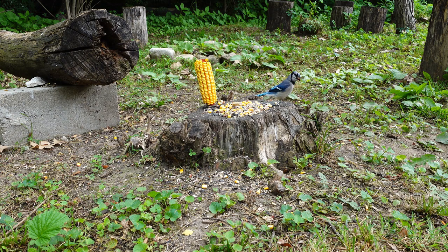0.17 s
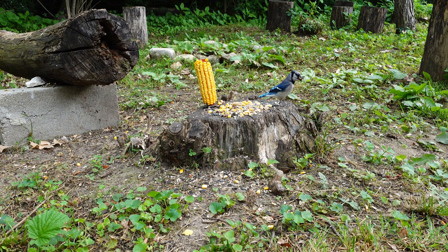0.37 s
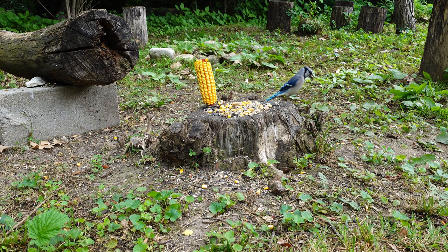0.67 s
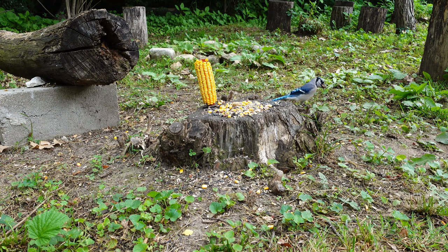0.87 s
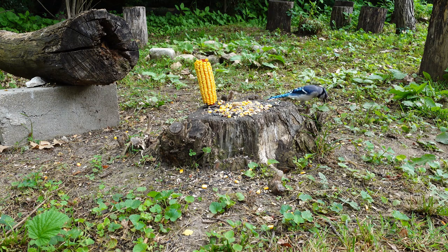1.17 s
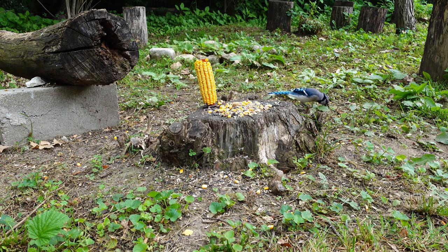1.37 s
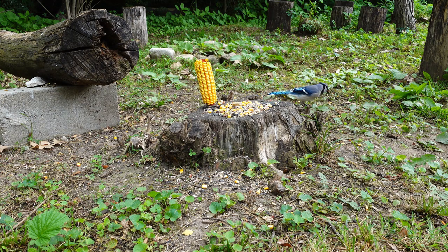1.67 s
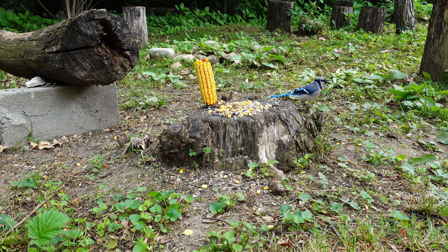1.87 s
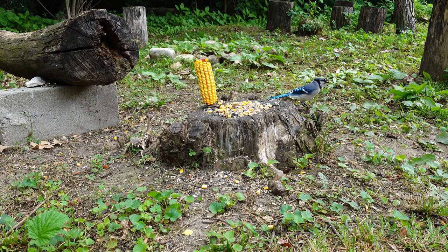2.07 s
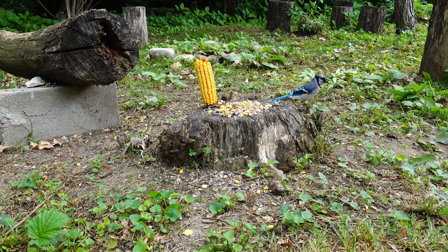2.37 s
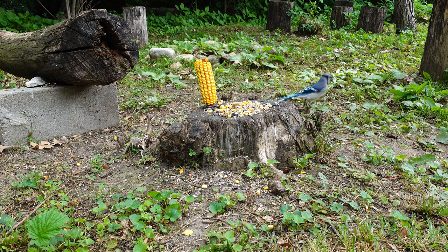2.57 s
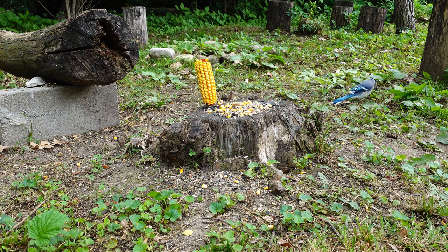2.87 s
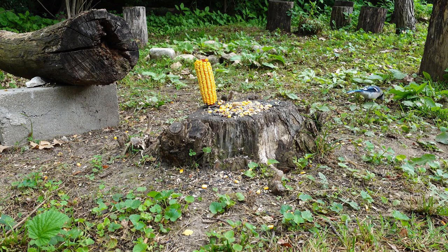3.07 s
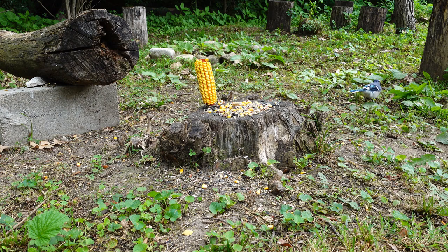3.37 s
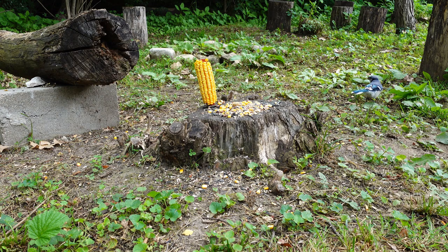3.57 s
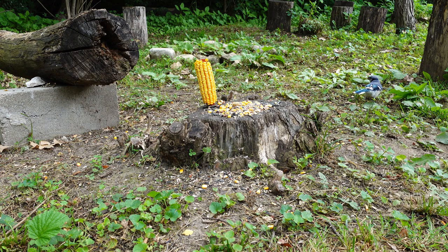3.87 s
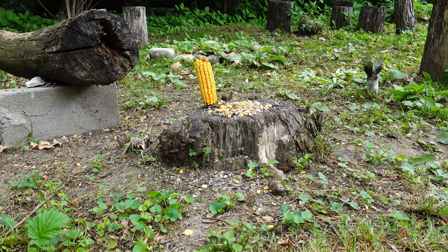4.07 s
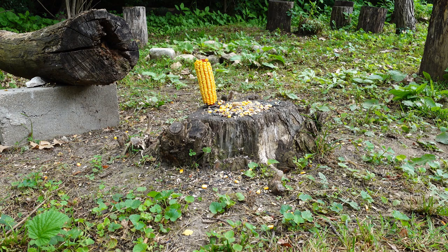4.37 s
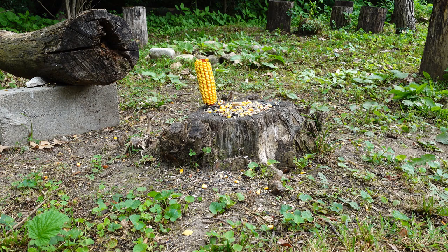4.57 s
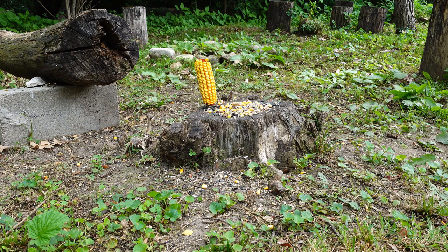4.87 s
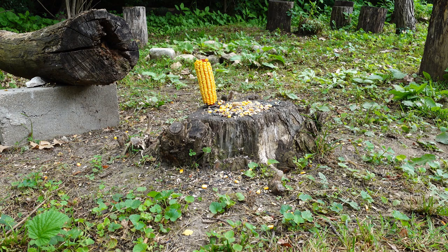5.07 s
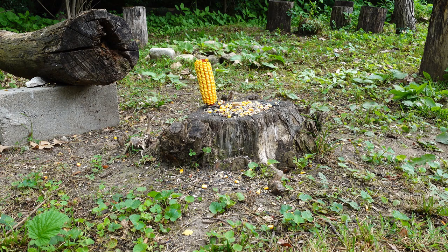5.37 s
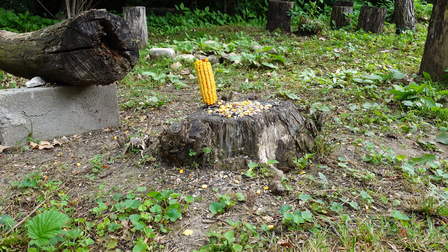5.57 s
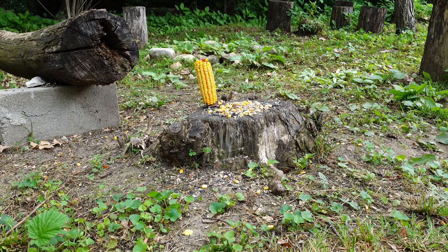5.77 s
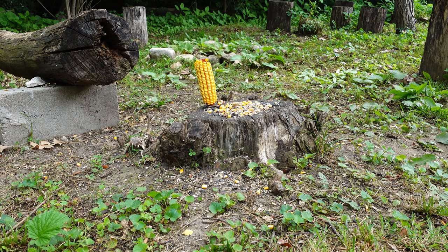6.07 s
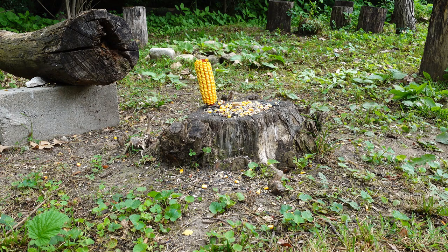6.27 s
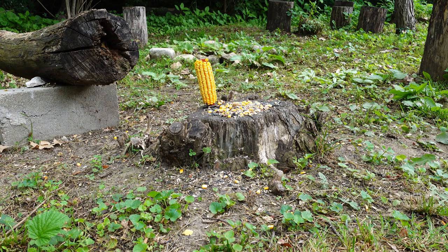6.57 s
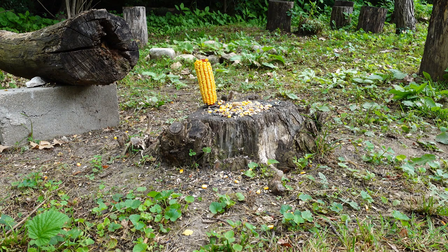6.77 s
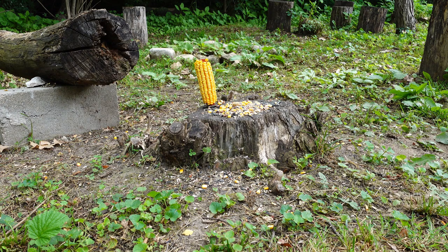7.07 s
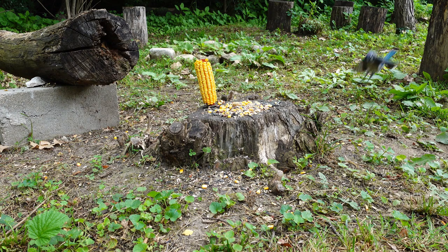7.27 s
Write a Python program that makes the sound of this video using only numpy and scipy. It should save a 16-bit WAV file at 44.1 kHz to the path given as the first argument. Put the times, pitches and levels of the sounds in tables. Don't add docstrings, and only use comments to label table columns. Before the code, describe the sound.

An open-air stereo microphone in a quiet wooded yard picks up a soft distant traffic hum centred near 1 kHz, slight low rumble and faint unsteady insect hiss throughout. Faint hoarse chirps come at 0.3 s, a tiny rustle at 0.8, and far falling slurs at 1.2, 1.6 and 1.9, with thin buzzy high notes around 1.7. At 2.5 s a jay a few metres right screams once until 2.85: a choked, fluttering start opens into a bright, strained, metallic shriek, sagging in pitch and cracking, with echoes off trunks. A distant quick descending trill runs from 3.0 to 3.6, then hoarse chirps. Wings rustle and puff softly from 4.1 to 4.8 as a jay takes off. Sparse chirps follow at 5.2, faint pips near 5.7, thin notes at 6.25 and rasps at 6.5. A clear wavering whistle sounds around 7.0, then a crisp wing rustle at 7.3 as another jay lands.

```python
import sys
import numpy as np
from scipy import signal
from scipy.fft import rfft, irfft, next_fast_len
from scipy.io import wavfile
from scipy.ndimage import uniform_filter1d

SR = 44100
rng = np.random.default_rng(int(sys.argv[2]) if len(sys.argv) > 2 else 0)


def log_audio(samples):
    frames = np.atleast_2d(samples).T
    limited = np.clip(frames, -1, 1)
    pcm = np.round(limited * 32767).astype(np.int16)
    wavfile.write(sys.argv[1], SR, pcm)


def undo_db(level):
    steps = np.asarray(level, float) / 20
    return 10 ** steps


N = 326781
T = np.arange(N) / SR

# t/s, pitch f/Hz, level/dB
SCREAM = [
    (2.503, 658, -59),
    (2.515, 657, -44.5),
    (2.538, 739, -44),
    (2.552, 757.5, -47.5),
    (2.65, 809.7, -26.5),
    (2.682, 797.2, -24),
    (2.795, 747.4, -25),
    (2.834, 732, -30),
    (2.846, 722, -46),
]
# multiple of pitch, level/dB
PARTIALS = [(1, -53.5), (2, -18.5), (3, -19), (4, 3), (5, -11.5), (6, -7.5), (7, -16), (8, -15.5),
            (9, -13.5), (10, -15.5), (11, -19), (12, -21.5), (13, -23), (14, -29.5), (15, -31.5), (16, -31),
            (17, -30.5), (18, -36.5), (19, -37), (20, -44), (21, -58.5)]
# f/Hz, gain/dB
CLOSED_BEAK = [(1300, 1), (3000, 0), (4600, -1), (6100, -8), (7600, 8.5), (9200, -10), (15000, -18)]
# f/Hz, left minus right level/dB
JAY_SIDE = [(60, -1), (110, 1.5), (200, -4), (380, -2.5), (700, 0.5), (1290, -4), (2380, -2.5),
            (4400, -4.0), (8120, -3.5), (15000, -6)]
ODD_DB = (-14.5, 3, -5.5, -4)
# brightness, dB/octave
BRIGHT_DB_PER_OCT = (0, -1, 7, 2.5)
SHARP = (0.42, 0.98, 1.0, 0.58)
BEAK_DB = (0.5, 0, -8.5, 12)
ROUGH = (.46, .05, .15, .48)

# t/s, level/dB
SLURS = [
    (1.184, -63),
    (1.609, -60),
    (1.895, -59),
]
# length/s, from f/Hz, to f/Hz
SLUR = (.073, 5570, 3000)
# first t/s, step/s, length/s, from f/Hz, to f/Hz
TRILL = (3.035, .092, .045, 4400, 2750)
# t/s, length/s, f/Hz, level/dB
PIPS = [
    (.11, .1, 4200, -80),
    (.82, .04, 4050, -80),
    (1.55, .06, 6050, -76),
    (2.26, .17, 2930, -70),
    (5.57, .03, 2750, -80),
    (5.7, .04, 2750, -79),
    (5.695, .03, 4100, -81),
    (5.84, .03, 2750, -82),
    (5.95, .05, 2750, -80),
    (7.21, .07, 2770, -75),
]
# t/s, f/Hz, level/dB
SEETS = [
    (1.67, 6900, -64.5),
    (1.69, 7730, -70),
    (4.22, 7800, -68),
    (4.22, 6830, -66.5),
    (6.24, 7700, -68),
    (6.27, 7460, -70),
    (6.25, 6880, -64),
]
# t/s, from f/Hz, to f/Hz, level/dB
ZEETS = [
    (1.72, 7420, 6190, -71),
    (1.9, 6800, 6400, -74.5),
    (2.15, 6960, 6880, -78),
    (4.24, 7300, 6600, -73),
    (6.25, 7200, 7030, -75),
    (6.29, 6690, 5900, -67.5),
]
# t/s, length/s, from f/Hz, to f/Hz, level/dB
CHIRPS = [(.28, 0.11, 2880, 2910, -85), (2.14, 0.076, 4870, 4230, -60), (3.6, 0.062, 4245, 4596, -57.5),
          (3.7, .06, 6500, 6570, -75), (4.32, 0.054, 4360, 4540, -59), (4.36, 0.038, 5080, 5150, -63),
          (4.33, .08, 3980, 3600, -70), (5.2, 0.053, 4330, 4790, -62.5), (5.225, 0.033, 3900, 3650, -59),
          (5.26, .1, 3680, 3230, -69.5), (6.475, 0.067, 4614, 4494, -57.5)]
# t/s, length/s, from f/Hz, to f/Hz, level/dB
RASPS = [
    (.22, 0.066, 6200, 5640, -66),
    (.26, 0.096, 4830, 4430, -61.5),
    (.3, 0.16, 4120, 3830, -78),
    (2.2, .09, 5400, 5100, -67.5),
    (3.58, 0.041, 6750, 8400, -75),
    (3.68, 0.069, 5120, 4640, -68),
    (4.4, 0.1, 5280, 4490, -71.5),
    (6.49, 0.067, 4220, 4234, -61),
    (6.53, 0.08, 4690, 4960, -64),
    (6.56, 0.077, 6020, 6530, -72),
]

# t/s, peak level/dB
RUSTLES = [(0.7894, -70), (4.065, -57.5), (4.133, -50), (4.174, -48), (4.24, -52), (4.256, -55),
           (4.315, -56), (4.3663, -55.5), (4.384, -52.5), (4.433, -57), (4.5032, -54), (4.6158, -53.5),
           (4.6827, -57), (4.735, -57), (4.787, -71), (6.905, -66), (6.9534, -58), (6.9603, -54.5),
           (7.3087, -54), (7.3225, -38.5), (7.34, -52), (7.3517, -51), (7.371, -57)]
# strongest t/s, level/dB
BOUTS = [
    (4.29, -60),
    (4.76, -69.5),
    (7.35, -67),
]
# f/Hz, level/dB per Hz
FEATHERS = [(880, -38), (1500, -3.5), (4360, -2), (5510, -3.5), (6390, -5), (9730, -8), (11200, -10.5),
            (15600, -13)]
# f/Hz, gain/dB
LANDING = [(1500, -22), (3200, -12), (5000, -4), (8000, 0), (11500, 2), (15500, -1.5)]
# f/Hz, level/dB per Hz
DOWNWASH = [(100, -14), (280, -2), (700, 2), (2200, -13.5), (4000, -34)]

# f/Hz, level/dB per Hz
TRAFFIC = [(120, -64), (200, -27), (268, -22.5), (480, -13.5), (586, -12.5), (875, -1), (1480, -9.5),
           (2520, -19.5), (2710, -18.5), (3560, -21), (5410, -22.5), (15600, -36)]
# f/Hz, left-right likeness 0-1
LIKENESS = [(60, 0.92), (130, 0.95), (290, 0.8), (640, 0.74), (1410, 0.6), (3100, 0.6), (6820, 0.57),
            (15000, 0.54)]
# f/Hz, level/dB per Hz
RUMBLE = [(20, -31.5), (45, -20.5), (64, -14.5), (78, -3.5), (100, -9), (145, -1), (270, -2), (400, -25),
          (700, -100)]
# f/Hz, level/dB per Hz
INSECTS = [(3200, -40), (3800, -15), (4050, 1), (4400, -17.5), (4900, -11), (5300, 0.5), (5650, -4),
           (6000, -30.5), (9000, -62)]


def unit(x):
    return x / np.sqrt(np.mean(np.abs(x) ** 2))


def along(table, hz):
    f, v = np.transpose(table)
    return np.interp(np.log(np.maximum(hz, 1)), np.log(np.maximum(f, 1)), v)


def colour(x, table):
    size = next_fast_len(x.shape[-1])
    gain = undo_db(along(table, np.fft.rfftfreq(size, 1 / SR)))
    return irfft(rfft(x, size) * gain, size)[..., :x.shape[-1]]


def wander(hz, size):
    lead = int(SR / hz)
    low_pass = signal.butter(2, hz, fs=SR, output="sos")
    return unit(signal.sosfilt(low_pass, rng.standard_normal(size + lead))[lead:])


def place(x, pan_db):
    return x * undo_db(np.array([[pan_db], [-pan_db]]) / 2)


def trunks(x, t60_s, rise_s, likeness):
    t = np.arange(SR) / SR
    mid, side = rng.standard_normal((2, SR))
    side = side * np.sqrt(1 - likeness)
    echoes = np.array([mid + side, mid - side])
    dull = signal.lfilter([.45], [1, -.55], echoes)
    echoes = dull + (echoes - dull) * np.exp(-t / 0.26)
    echoes = echoes * undo_db(-60 * t / t60_s) * (1 - np.exp(-t / rise_s))
    return signal.fftconvolve(x[None], unit(echoes) / np.sqrt(SR), axes=1)[:, :N]


def jay_voice():
    opens_s, open_s, crack_s, crack_lasts_s = 2.6, 2.655, 2.784, .01
    flutter_hz, flutter_bend, flutter_fade_s = 140, .038, 0.054
    beak_hz, beak_width_hz = 4040, 700
    s, *columns = np.transpose(SCREAM)
    on = (T >= s[0]) & (T < s[-1])
    t = T[on]
    size = len(t)
    hz, db = (np.interp(t, s, c) for c in columns)
    hz = uniform_filter1d(hz, size=900)

    states_s = [opens_s, open_s, crack_s, crack_s + crack_lasts_s]
    settings = (ODD_DB, BRIGHT_DB_PER_OCT, SHARP, BEAK_DB, ROUGH)
    odd_db, bright_db, sharp, beak_db, rough = (np.interp(t, states_s, v) for v in settings)
    bright_db = bright_db + 0.4 * (db - db.max())
    closure = np.clip(1 - ((t - s[0]) / (open_s - s[0])) ** 1.6, 0, 1)

    flutter = 1.15 * np.exp(-((t - s[0]) / flutter_fade_s) ** 2)
    flutter = flutter + np.interp(t, [crack_s, s[-1]], [0, .3])
    rate_hz = flutter_hz * (1 + .15 * flutter ** 2 + .03 * wander(40, size))
    beat = np.cumsum(rate_hz) / SR % 1
    slip = uniform_filter1d(beat - .5, size=40)
    gap = np.exp(-(np.minimum(beat, 1 - beat) / (.15 + .2 * flutter ** 2)) ** 2)
    bend = flutter_bend * (.6 + 2 * np.clip(flutter, .12, .3))
    jitter = 0.022 * rough * wander(270, size)
    phase = 2 * np.pi * np.cumsum(hz * (1 + bend * slip + jitter)) / SR

    voice, power = 0, 0
    for k, partial_db in PARTIALS:
        beak = beak_db * np.exp(-((k * hz - beak_hz) / beak_width_hz) ** 2)
        gain_db = sharp * partial_db + (k % 2) * (odd_db + 11 * flutter)
        gain_db = gain_db + bright_db * np.log2(max(k, 4) / 4)
        gain = undo_db(gain_db + beak + closure * along(CLOSED_BEAK, k * hz))
        smear = np.clip(np.clip(rough, .05, .5) * (k / 4) ** .8, 0, .92)
        haze = (wander(25 * k + 100, size) + 1j * wander(25 * k + 100, size)) / np.sqrt(2)
        wave = (np.sqrt(1 - smear ** 2) + smear * haze) * np.exp(1j * k * (phase - 0.078 * k))
        chop = 1 - np.clip(np.maximum(flutter, .1) * max(k - 3.3, .6) ** .75, 0, 1) * gap
        voice = voice - gain * chop * wave.real * (k * hz < .45 * SR)
        power = power + gain ** 2 / 2
    dry = np.zeros(N)
    dry[on] = voice / np.sqrt(power) * undo_db(db)
    return signal.sosfilt(signal.butter(4, 700, "high", fs=SR, output="sos"), dry)


def jay():
    voice = jay_voice()
    near = np.array([colour(voice, [(f, sign * v / 2) for f, v in JAY_SIDE]) for sign in (1, -1)])
    scattered = colour(voice, [(1500, 2), (3100, 2.5), (4200, 5), (8000, 7.5), (15000, -0.5)])
    deep_woods = undo_db(-28) * trunks(scattered, t60_s=.8, rise_s=.03, likeness=.6)
    close_trunks = undo_db(-19.5) * trunks(scattered, t60_s=.3, rise_s=0.007, likeness=0.62)
    return near + close_trunks + deep_woods


def notes(table, buzz_hz):
    out = np.zeros(N + SR)
    for s, length_s, from_hz, to_hz, db in table:
        u = T[:SR // 4] / length_s
        size = len(u)
        shake = np.sin(2 * np.pi * np.cumsum(96.7 * (1 + .25 * wander(40, size))) / SR)
        shake = shake + .8 * wander(180, size)
        hz = from_hz + (to_hz - from_hz) * np.minimum(u, 1) ** 1.1
        hz = hz + buzz_hz * shake * np.clip(.35 + u, 0, 1)
        swell = np.sqrt(np.clip(np.sin(np.pi * np.minimum(u, 1)), 0, 1)) ** 0.41
        tone = np.sin(2 * np.pi * np.cumsum(hz) / SR) * swell
        start = int(s * SR)
        out[start:start + size] += undo_db(db + 5.5) * tone
    return out[:N]


def whistle():
    start_s, end_s, wave_s = 6.89, 7.215, .258
    middle_hz, swing_hz = 2510, 341
    loudest_s, swell_s = 7.07, 0.06
    on = uniform_filter1d(1. * ((T > start_s) & (T < end_s)), size=600)
    hz = middle_hz - swing_hz * np.cos(2 * np.pi * (T - start_s) / wave_s)
    level_db = -61.5 - ((T - loudest_s) / swell_s) ** 2 + 2.0 * wander(45, N)
    return on * undo_db(level_db) * np.sin(2 * np.pi * np.cumsum(hz) / SR)


def far(x, direct_db, t60_s, pan_db):
    echoes = trunks(x, t60_s, rise_s=0.0068, likeness=0.78)
    return place(undo_db(direct_db) * x + echoes, pan_db)


def songbirds():
    first_s, step_s, *glide = TRILL
    trill = [(first_s + k * step_s, *glide, -60.5) for k in range(7)]
    slurs = [(s, *SLUR, db) for s, db in SLURS]
    pips = [(s, length_s, hz, hz, db) for s, length_s, hz, db in PIPS]
    seet_s = 0.086
    seets = [(s, seet_s, hz, hz, db) for s, hz, db in SEETS]
    zeets = [(s, seet_s, *rest) for s, *rest in ZEETS]
    clear = notes(slurs + trill, buzz_hz=0) + notes(pips, buzz_hz=30)
    high = notes(seets, buzz_hz=110) + notes(zeets, buzz_hz=340)
    hoarse = notes(CHIRPS, buzz_hz=330) + notes(RASPS, buzz_hz=620)
    return (far(clear, -13, t60_s=1.0, pan_db=-1.0) + far(high, -13, t60_s=0.93, pan_db=3.5)
            + far(hoarse, -13, t60_s=0.71, pan_db=-0.8) + far(whistle(), 1.7, t60_s=0.85, pan_db=-4.5))


def rustles():
    out = np.zeros((2, N + SR))
    t = np.arange(SR // 10) / SR
    peak_s, decay_s = .02, 0.0045
    for s, db in RUSTLES:
        grain = rng.standard_normal(len(t)) * undo_db(2.2 * rng.standard_normal(len(t)))
        fade_s = np.clip(decay_s * np.where(t < peak_s, .8, .6), .0003, .03)
        burst = grain * np.exp(-np.abs(t - peak_s) / fade_s)
        start = int((s - .018) * SR)
        out[:, start:start + len(t)] += place(undo_db(db) * burst, pan_db=-4.5)
    return out[:, :N]


def swish():
    build_db_s, fade_db_s = 59, 40
    level = sum(undo_db(db - np.where(T < s, build_db_s, fade_db_s) * np.abs(T - s)) for s, db in BOUTS)
    air = level * undo_db(3.5 + 1.35 * wander(25, N)) * rng.standard_normal(N)
    return place(air, pan_db=-5.5)


def downwash():
    takeoff_s, spread_s, wingbeat_hz = 4.26, .08, 15
    level_db = -77 - 2.7 * ((T - takeoff_s) / spread_s) ** 2
    level_db = level_db + 9.9 * np.cos(2 * np.pi * wingbeat_hz * (T - 4.178)) + 1.6 * wander(11, N)
    return unit(colour(rng.standard_normal(N), DOWNWASH)) * undo_db(level_db)


def wings():
    feathers = colour(rustles() + swish(), FEATHERS)
    return np.where(T < 6, feathers, colour(feathers, LANDING)) + downwash()


def traffic():
    size = next_fast_len(N)
    hz = np.fft.rfftfreq(size, 1 / SR)
    like = np.clip(along(LIKENESS, hz), 0, 1)
    noise = rfft(rng.standard_normal((2, size))) * undo_db(along(TRAFFIC, hz))
    mid, side = noise * np.sqrt([1 + like, 1 - like])
    pair = np.array([mid + side, mid - side])
    hum, swell = 0, wander(0.27, N)
    for centre_hz in 30 * 2 ** np.arange(10):
        share = np.clip(1 - np.abs(np.log2(np.maximum(hz, 30) / centre_hz)), 0, 1)
        hum = hum + irfft(pair * share, size)[:, :N] * undo_db(.5 * swell + 0.93 * wander(20.0, N))
    rumble = colour(rng.standard_normal(N) + .12 * rng.standard_normal((2, N)), RUMBLE)
    return undo_db(-63.58) * unit(hum) + undo_db(-86.5) * unit(rumble)


def insects():
    hiss = rng.standard_normal((2, N)) * undo_db(3.7 * wander(5.6, N))
    return undo_db(-79.5) * unit(colour(hiss, INSECTS))


def scene():
    return jay() + songbirds() + wings() + traffic() + insects()


def top_cut(x):
    return signal.sosfilt(signal.butter(12, 15710, fs=SR, output="sos"), x)


def record(dry):
    mix = signal.sosfilt(signal.ellip(10, .2, 70, 15700, fs=SR, output="sos"), dry)
    return top_cut(mix)


dry = scene()
out = record(dry)
log_audio(out)
```